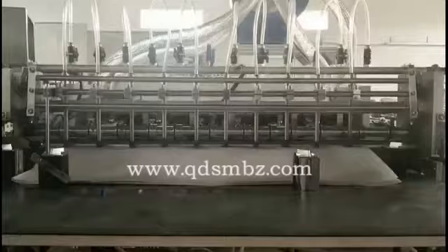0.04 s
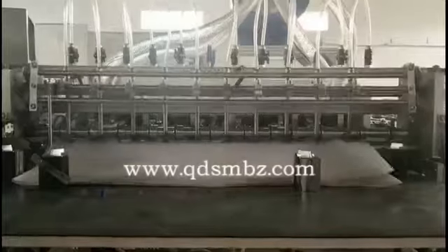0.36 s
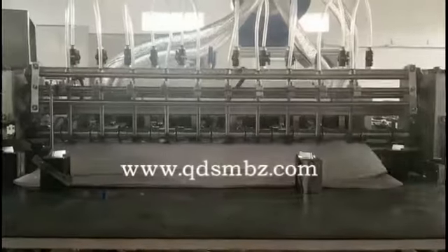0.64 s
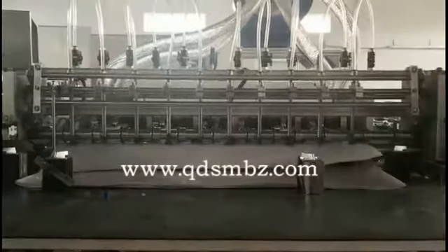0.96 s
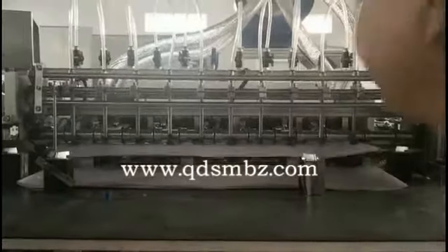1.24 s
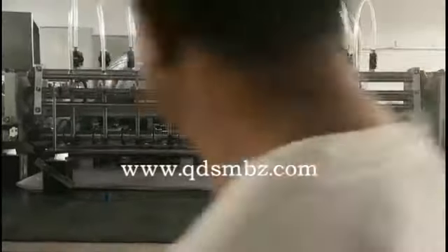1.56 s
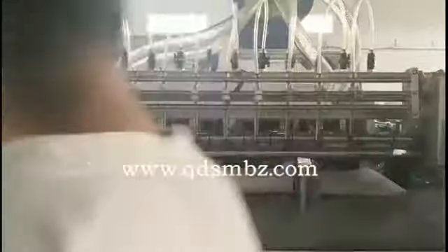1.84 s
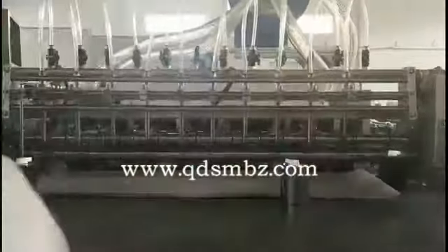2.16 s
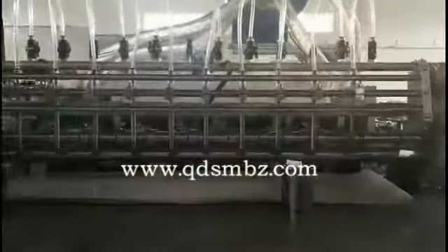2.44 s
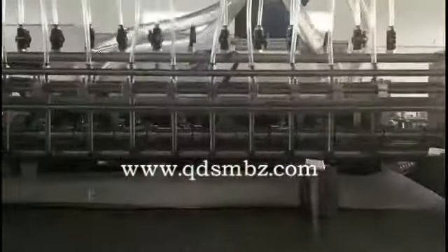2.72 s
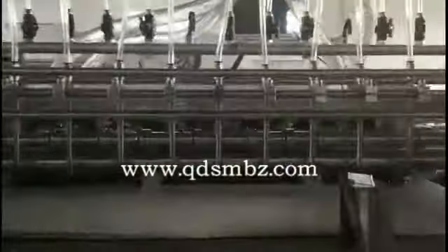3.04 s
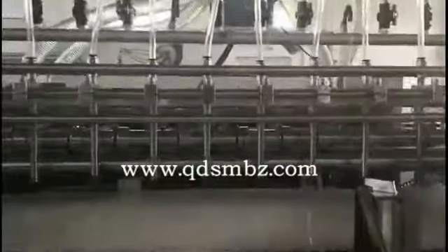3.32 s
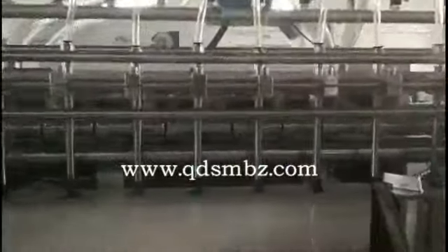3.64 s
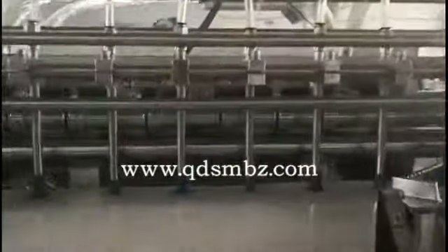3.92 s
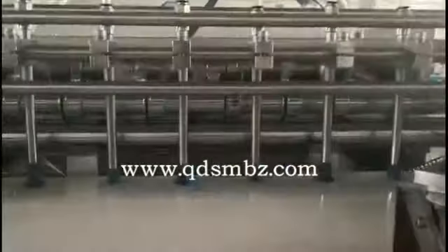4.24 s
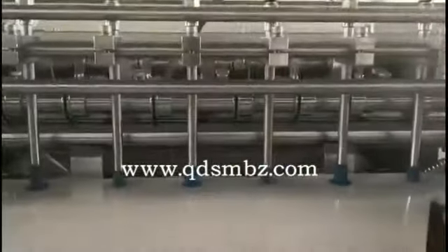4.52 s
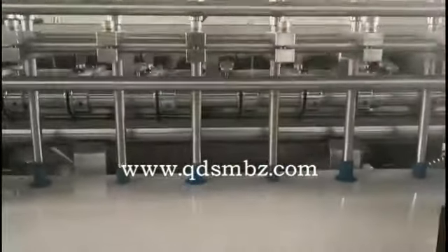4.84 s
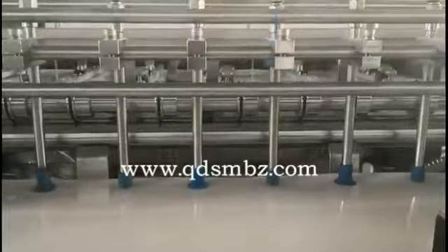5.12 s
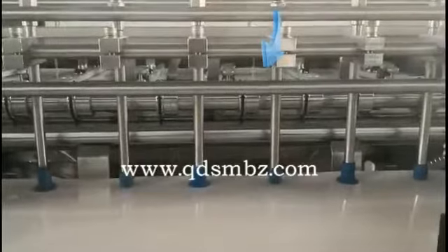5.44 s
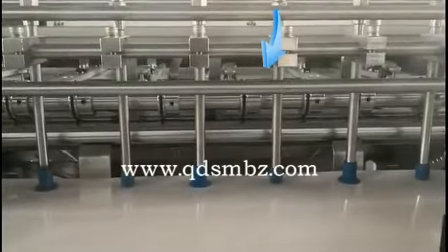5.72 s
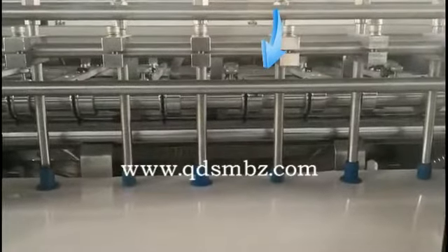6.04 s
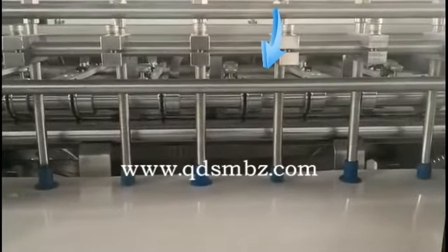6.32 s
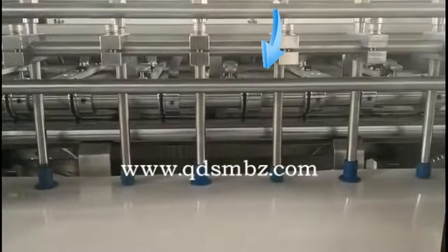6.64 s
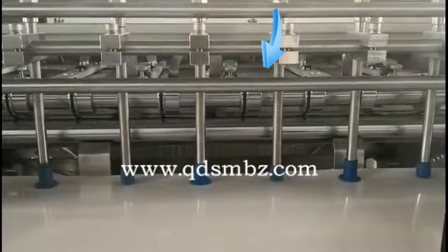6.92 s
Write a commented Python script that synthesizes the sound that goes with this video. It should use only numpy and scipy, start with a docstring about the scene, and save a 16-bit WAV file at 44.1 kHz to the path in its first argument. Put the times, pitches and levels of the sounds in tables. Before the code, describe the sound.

Steady air hiss and a low pump hum come from a paper feeding machine, over the roar of a factory. Metal clangs, rubs and clinks further off in the first seconds, and the hiss is briefly muffled. The microphone then closes in on the suction cups, where a nozzle whistles hoarsely and the hum strengthens. A few soft thuds sound, and near the end metal screeches briefly, echoing in the hall.

```python
"""Sheet feeder in a factory hall

A vacuum pump hums and rumbles, air hisses out of the suction heads and one nozzle whistles hoarsely.
Someone walks past and briefly blocks the hiss, then the microphone moves in close to the suckers.
Other machines roar and whine. Further off, metal rings as it is rubbed and knocked,
and once it slips with a short screech that echoes in the hall."""
import sys
import numpy as np
from scipy import signal
from scipy.fft import rfft, irfft
from scipy.io import wavfile

SR = 44100
rng = np.random.default_rng(int(sys.argv[2]) if len(sys.argv) > 2 else 0)


def log_audio(samples):
    """Write samples as a 16-bit WAV file to the path given in sys.argv[1]."""
    # one column per channel
    frames = np.atleast_2d(samples).T
    # limit to full scale, then quantise
    limited = np.clip(frames, -1, 1)
    pcm = np.round(limited * 32767).astype(np.int16)
    wavfile.write(sys.argv[1], SR, pcm)


N = 311787
TIME = np.arange(N) / SR
FREQ = np.maximum(np.arange(N // 2 + 1) * SR / N, 1)
PASS_S = 1.564  # someone crosses the air jets, right to left

# How loud the pump rumbles: time_s, level_db
RUMBLE_LEVELS = [(0.2, -34.3), (1.0, -34.6), (1.6, -38.2), (2.25, -38.5), (2.6, -36.5), (3.9, -34),
                 (5.3, -35), (7.05, -32)]
# Tone colour of the rumble: pitch_hz, relative_db
RUMBLE_COLOUR = [(20, -26), (45, -14), (70, -8.5), (95, 1), (110, -7.5), (135, -1), (185, -11.5),
                 (260, -11.5), (400, -20.5), (520, -37), (800, -59)]
# Tone colour of the leaking air: pitch_hz, left_relative_db, right_relative_db
HISS_COLOUR = [(150, -45, -45), (700, -28, -37), (1990, -21.5, -12), (3110, 0, -3), (3840, -3, -2.5),
               (4500, 0, 1), (5070, 3.5, 0), (5600, -6, 4), (6000, -1, 0), (6710, 4, 4.5), (8250, -5.5, -2),
               (9210, 1.5, -3.5), (10560, -4.5, -20.5), (12220, -14, -14.5), (15100, -17.5, -17)]
# Tone colour of the nozzle: pitch_hz, relative_db
WHISTLE_COLOUR = [(5500, -74), (6500, -11), (7100, -4), (7450, -0.5), (7780, 2), (8000, -1), (8350, -11.5),
                  (9500, -37), (12000, -55)]
# Ringing of ducts and frame (side_db is always left minus right):
# pitch_hz, width_hz, level_db, side_db, nearest_s, half_span_s
DUCT_RINGS = [(167, 25, -46, -3, 2.23, 0.44), (395.5, 62, -46, -4.5, 5.4, 1.34),
              (884, 49, -47.5, 7, 1.5, 1.8), (1060, 140, -46.5, 4, 3.55, 0.86),
              (2680, 140, -48, -9, 2.1, 1.3), (3840, 400, -39.5, -4, 2.4, 0.96),
              (4540, 320, -42.5, -13.5, 5.9, 1.4), (5850, 440, -42, 15, 3.1, 1.26)]
# Tone colour of the other machines: pitch_hz, relative_db
ROAR_COLOUR = [(60, -38), (200, -11), (400, -7.5), (560, -10.5), (720, -1), (860, 1), (1180, -4),
               (1600, 0.5), (2100, -1), (2480, 3.5), (2950, -6), (4000, -5.5), (8000, -56)]
# Whines of motors and gears: pitch_hz, level_db
MOTOR_WHINES = [(714, -53.5), (760, -58), (831, -61.5), (1053, -55.5), (1335, -62), (1448, -52.5),
                (1600, -51.5), (2481, -57)]
# Notes at which the rubbed metal rings: pitch_hz, width_hz, relative_db
METAL_NOTES = [(1273, 43, 4), (1335, 12, 9.5), (1402, 33, 4), (1446, 5.5, 7.5), (1537, 11, 6.5),
               (1645, 18, 4), (1440, 240, 4.5)]
# Strokes over that metal: peak_s, level_db, half_span_s
STROKES = [(0.5, -39, 0.35), (1.54, -37, 0.1), (1.84, -41, 0.035), (2.48, -34.5, 0.13)]
# Ringing of a far clang: pitch_hz, width_octaves, relative_db, decay_s
CLANG_BANDS = [(1920, 3.1, -2, 0.8), (1900, 0.53, -0.5, 0.45), (544, 0.9, -13, 1)]
# Clinks of small steel parts: start_s, level_db, pitch_hz, decay_s, side_db
STEEL_CLINKS = [(0.215, -24.5, 1280, 0.2, -3), (1.617, -21.5, 2480, 0.038, -9),
                (1.738, -23.5, 2500, .04, -13), (2.118, -24, 1370, .14, -5), (3.955, -25.5, 2000, .25, -2)]
# Ringing of a sharp clack: pitch_hz, width_octaves, relative_db, decay_s
CLACK_BANDS = [(1650, 1.2, 0, 0.027), (6400, 0.39, -3, 0.1), (1910, 1.9, -10.5, .3)]
# Dull thuds of the feeder: start_s, strength_db
FEEDER_THUDS = [(4.409, -32), (4.916, -32.5), (5.410, -31), (6.335, -31)]
# Ringing of each thud: pitch_hz, width_octaves, relative_db, decay_s
THUD_BANDS = [(443, 0.95, 0.5, 0.14)]
# Slips of the screeching part: peak_s, force_db, length_s, side_db
METAL_SLIPS = [(5.743, -20, 0.018, 14), (5.768, -13.5, .014, 8), (5.789, -20, .008, -4),
               (5.799, -15.5, 0.005, 2), (5.99, -31, 0.03, -5)]
# Tone colour the screech is made from: pitch_hz, relative_db
SCREECH_COLOUR = [(1400, -45), (1550, -7.5), (1605, -4), (1650, -6.5), (1725, -1), (1790, -16), (1840, 0),
                  (1890, -10), (1950, -10), (2100, -13.5), (2400, -19), (3000, -33)]


def from_db(db):
    """Turn decibels into a number to multiply by."""
    return 10 ** (np.asarray(db) / 20)


def unit_level(x):
    """Scale a signal to an average (rms) strength of 1."""
    return x / np.sqrt(np.mean(x ** 2) + 1e-20)


def drift(rate_hz):
    """A random wobble of size 1, mostly slower than rate_hz."""
    return unit_level(irfft(rfft(rng.standard_normal(N)) / (1 + (FREQ / rate_hz) ** 2), N))


def step(middle_s, edge_s):
    """A soft rise from 0 to 1."""
    return .5 + .5 * np.tanh((TIME - middle_s) / edge_s)


def swell(peak_s, half_span_s):
    """A smooth rise to 1 and back."""
    return np.exp(-.5 * ((TIME - peak_s) / half_span_s) ** 2)


def moving_in(far, near, start_s=1.58, end_s=5):
    """Glide from the far value to the near one as the microphone moves in."""
    way = np.clip((TIME - start_s) / (end_s - start_s), 0, 1)
    return far + (near - far) * np.sin(np.pi / 2 * way) ** 2


def pan(side_db):
    """Place a sound left (above 0) or right (below 0) at the same power."""
    sides = from_db(np.array([[.5], [-.5]]) * side_db)
    return sides / np.sqrt(np.mean(sides ** 2, axis=0))


def colour(table):
    """Join a table's points into a gain for every pitch."""
    hz, *columns = np.transpose(table)
    return np.array([from_db(np.interp(np.log(FREQ), np.log(hz), db)) for db in columns])


def resonance(hz, width_hz):
    """A gain that favours pitches near one note."""
    return 1 / (1 + (2 * (FREQ - hz) / width_hz) ** 2) ** .75


def noise(gain, direct=0, lag_s=0, bass_hz=540):
    """Stereo noise of level 1, alike in the bass; a direct share reaches the right lag_s early."""
    alike = (1 - direct) * np.sinc((FREQ / bass_hz) ** 2) + direct * np.exp(2j * np.pi * FREQ * lag_s)
    left, separate = rfft(rng.standard_normal((2, N)))
    right = alike * left + np.sqrt(np.maximum(1 - np.abs(alike) ** 2, 0)) * separate
    both = irfft(gain * np.array([left, right]), N)
    return both / both.mean(axis=0).std()


def pump(hum_hz=301, wobble_hz=0.58, throb_db=1.36, waver_db=1.35):
    """The spinning rotor hums one clean note over the rumble of the frame."""
    rumble_db = np.interp(TIME, *np.transpose(RUMBLE_LEVELS))
    rumble = noise(colour(RUMBLE_COLOUR)) * from_db(rumble_db + throb_db * drift(8.7))
    phase = 2 * np.pi * np.cumsum(hum_hz + wobble_hz * drift(2.8)) / SR
    phase = phase + moving_in(0, 0.75) * np.array([[0], [1]])  # close up, the right side leads
    hum_gain = moving_in(from_db(-44.5), from_db(-34)) * pan(moving_in(-1.5, 0))
    dip_db = 5.5 * swell(PASS_S + 0.45, 0.45)  # the person goes by
    return rumble + np.sqrt(2) * np.sin(phase) * hum_gain * from_db(waver_db * drift(4) - dip_db)


def air_leaks(shade, treble_hz=9000):
    """Swirling air hisses out of the suction heads."""
    level_db = moving_in(-32.5, -27.5) - 2.5 * shade
    side_db = moving_in(-1.5, -3.4) + 9 * shade
    hiss = noise(colour(HISS_COLOUR), direct=0.14, lag_s=0.000704) * pan(side_db) * from_db(level_db)
    # High sounds travel straightest, so they fade first with shade and distance.
    treble = irfft(rfft(hiss) / (1 + (treble_hz / FREQ) ** 8), N)
    return hiss + treble * (from_db(0.51 * (level_db - level_db.mean())) - 1)


def nozzle(shade, enter_s=3.38, loss_db_per_s=0.32, wander_s=0.9, sputter_db=0.3):
    """A wandering jet whistles on the right; the microphone enters its beam, then drifts off."""
    since_s = TIME - enter_s
    wander_db = 0.8 * np.sin(2 * np.pi * since_s / wander_s)
    beam_db = step(enter_s, 0.061) * (5.5 - loss_db_per_s * since_s + wander_db)
    whistle = noise(colour(WHISTLE_COLOUR), direct=0.42, lag_s=-0.000249) * pan(-29)
    return whistle * from_db(-32 + beam_db - 7 * shade + sputter_db * drift(50))


def passer_by(near_s=0.49, cover_s=0.06, clear_s=0.39, reflected=0.36):
    """A body's shade: it reflects the hiss (below 0), blocks it (above 0), then clears."""
    covered = step(PASS_S, cover_s)
    apart_s = np.abs(TIME - PASS_S)
    return covered * np.exp(-apart_s / clear_s) - (1 - covered) * reflected * np.exp(-apart_s / near_s)


def bar_echoes(sound, echo_db=-12.5, sway_s=.00004, count=3):
    """Quick echoes off steel bars colour a sound, shifting as the microphone sways."""
    out = sound.copy()
    for side in range(2):
        for lag_s in rng.uniform(0.001002, .008, count):
            echo_time = TIME - lag_s - sway_s * drift(0.55)
            out[side] += from_db(echo_db) * np.interp(echo_time, TIME, sound[side])
    return out


def air(flutter_db=0.55):
    """Hiss and whistle bounce off the bars and flutter together."""
    shade = passer_by()
    return bar_echoes(air_leaks(shade) + nozzle(shade)) * from_db(flutter_db * drift(39))


def ducts(flutter_db=2.24):
    """Ducts and frame ring; each note swells as the microphone passes its spot."""
    out = 0
    for hz, width_hz, db, side_db, nearest_s, half_span_s in DUCT_RINGS:
        ring = noise(resonance(hz, width_hz)) * pan(side_db)
        out = out + ring * swell(nearest_s, half_span_s) * from_db(db + flutter_db * drift(28))
    return out


def factory(roar_db=-35.5, flutter_db=1.09, waver_db=2.5):
    """Other machines blur into a roar; a few whines stand out, wavering with their load."""
    surge_db = 4.5 * swell(peak_s=6.35, half_span_s=0.035)
    roar = noise(colour(ROAR_COLOUR), direct=0.19, lag_s=0.00063)
    roar *= from_db(roar_db + surge_db + flutter_db * drift(21))
    whines = 0
    for hz, db in MOTOR_WHINES:
        pitch_hz = hz * (1 + 0.001967 * drift(3.84))
        phase = 2 * np.pi * np.cumsum(pitch_hz) / SR + rng.uniform(0, np.pi, (2, 1))
        whines = whines + np.sqrt(2) * np.sin(phase) * from_db(db + waver_db * drift(5.9))
    return bar_echoes(roar) + whines


def rubbing(sink_hz_per_s=95, reach_hz=210, rough_db=1.2):
    """Uneven friction makes metal ring, most of all near a slowly sinking pitch."""
    light_touch = from_db(moving_in(-39.5, -57.5))  # left behind as the microphone moves in
    strokes = sum(from_db(db) * swell(peak_s, half_span_s) for peak_s, db, half_span_s in STROKES)
    centre_hz = np.maximum(1600 - sink_hz_per_s * TIME, 1385)
    ring = 0
    for hz, width_hz, db in METAL_NOTES:
        share = 1 / (1 + ((hz - centre_hz) / reach_hz) ** 2)
        ring = ring + noise(resonance(hz, width_hz), direct=0.34) * from_db(db) * share
    return unit_level(ring) * pan(-4.5) * (light_touch + strokes) * from_db(rough_db * drift(27))


def hit(start_s, db, bands, side_db):
    """A struck part rings at many close notes: bands of noise, each dying 60 dB in its decay_s."""
    out = np.zeros((2, N + SR))
    age_s, start = TIME[:SR // 2], int(start_s * SR)
    for hz, octaves, band_db, decay_s in bands:
        edges_hz = np.minimum(hz * 2 ** (np.array([-.5, .5]) * octaves), SR / 2 - 1)
        band = signal.butter(2, edges_hz, "band", fs=SR, output="sos")
        ring = unit_level(signal.sosfilt(band, rng.standard_normal((2, len(age_s)))))
        out[:, start:start + len(age_s)] += ring * from_db(db + band_db - 60 * age_s / decay_s)
    return pan(side_db) * out[:, :N]


def knocks(echo_db=-10):
    """A far clang, clinks, a clack on the right and dull thuds, all echoing in the hall."""
    out = hit(start_s=0.112, db=-21.5, bands=CLANG_BANDS, side_db=-1.5)
    for start_s, db, hz, decay_s, side_db in STEEL_CLINKS:
        out += hit(start_s, db, [(hz, 0.27, 0, decay_s)], side_db)  # one narrow band
    out += hit(start_s=1.518, db=-16, bands=CLACK_BANDS, side_db=-11)
    out += sum(hit(start_s, db, THUD_BANDS, side_db=-2) for start_s, db in FEEDER_THUDS)
    return out + from_db(echo_db) * hall(out)


def hall(sound, decay_s=1.3, dull_hz=4500, build_s=0.0065):
    """Countless echoes off the walls build up, then die away."""
    envelope = from_db(-60 * TIME / decay_s) * (1 - np.exp(-TIME / build_s))
    tail = noise(1 / (1 + (FREQ / dull_hz) ** 2)) * envelope
    tail = tail[:, :2 * SR] / np.sqrt(np.sum(tail ** 2) / 2)
    return signal.fftconvolve(sound.mean(axis=0)[None], tail, axes=1)[:, :N]


def screech(drag_s=5.8, hold_s=0.26, rough_db=3.3, band_hz=(1480, 2450), echo_db=-4.5):
    """Metal slips in short jerks, drags and stops, ringing at a cluster of close notes."""
    drag = step(drag_s, 0.008) * (1 - step(drag_s + hold_s, 0.035))
    force = pan(-4) * drag * from_db(-28.5 + rough_db * drift(60))
    for peak_s, db, length_s, side_db in METAL_SLIPS:
        force = force + pan(side_db) * from_db(db) * np.exp(-(2 * (TIME - peak_s) / length_s) ** 2)
    # Friction limits the swing: keep only the noise's phase and let the force set the loudness.
    phase = np.angle(signal.hilbert(noise(colour(SCREECH_COLOUR))))
    body = signal.butter(2, band_hz, "band", fs=SR, output="sos")
    squeal = signal.sosfilt(body, force * np.sqrt(2) * np.cos(phase))
    return squeal + from_db(echo_db) * hall(squeal)


def scene():
    """The feeder close by, the hall around it."""
    return pump() + air() + ducts() + factory() + rubbing() + knocks() + screech()


def record(dry, start_s=0.106, fade_s=0.012, cutoff_hz=15050):
    """Fade in after a moment of near silence and cut the highest treble."""
    faded = dry * np.clip((TIME - start_s) / fade_s, from_db(-66), 1)
    return signal.sosfilt(signal.ellip(12, .1, 90, cutoff_hz, fs=SR, output="sos"), faded)


dry = scene()
out = record(dry)
log_audio(out)
```